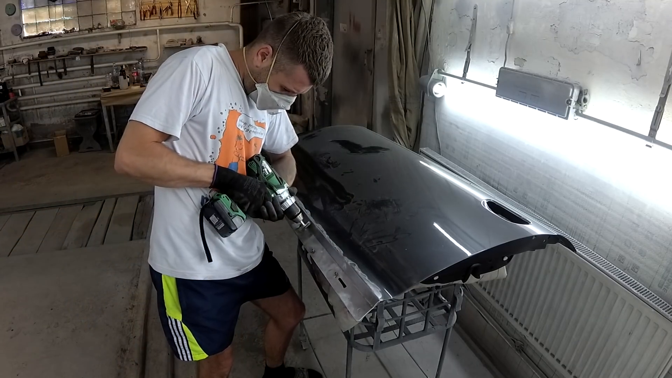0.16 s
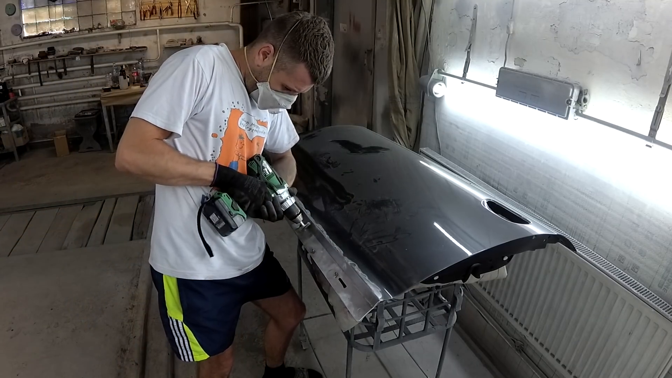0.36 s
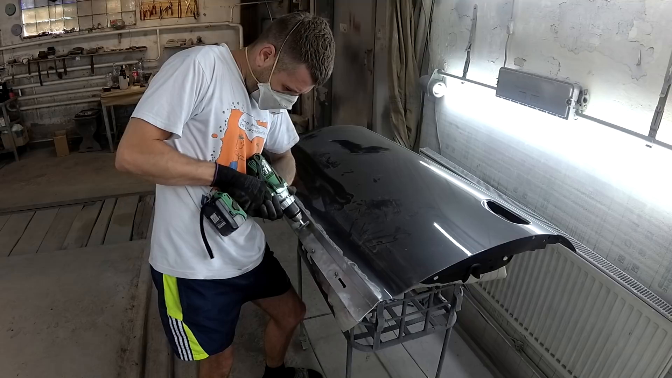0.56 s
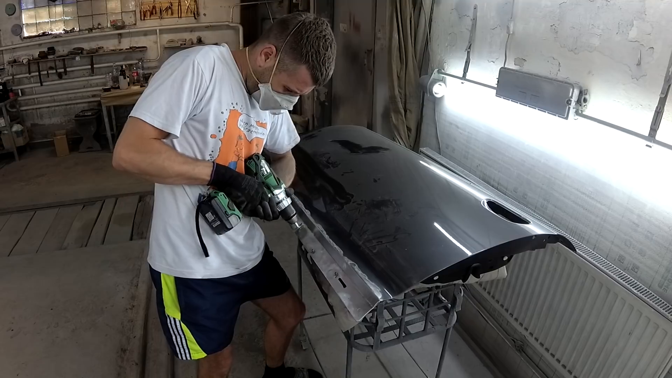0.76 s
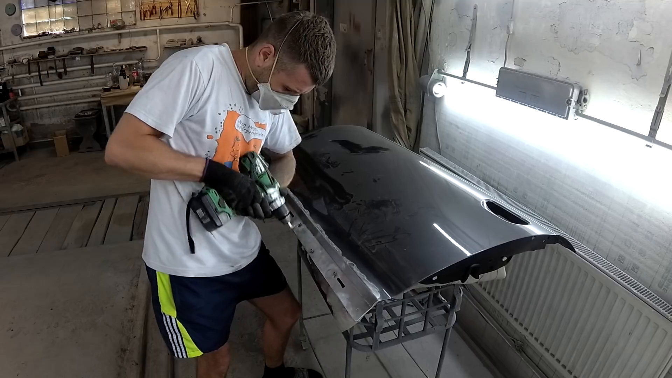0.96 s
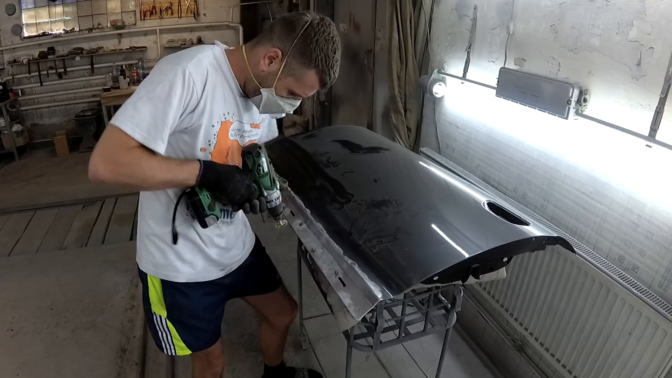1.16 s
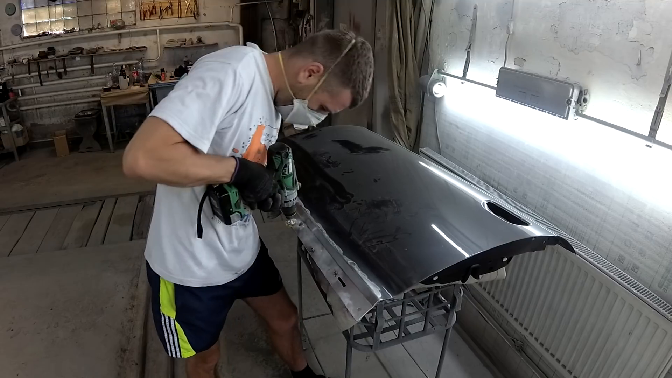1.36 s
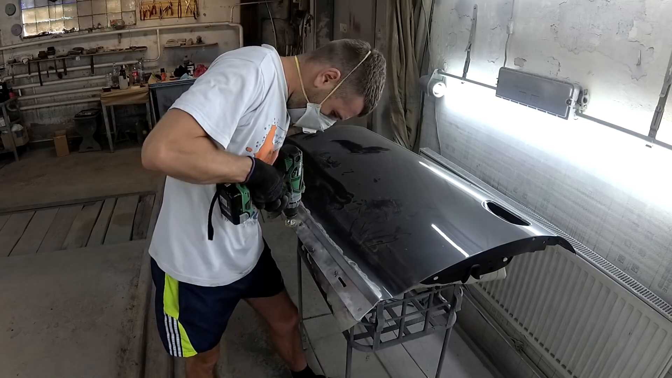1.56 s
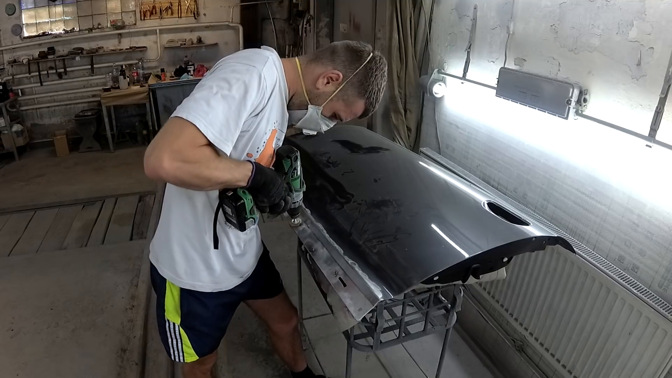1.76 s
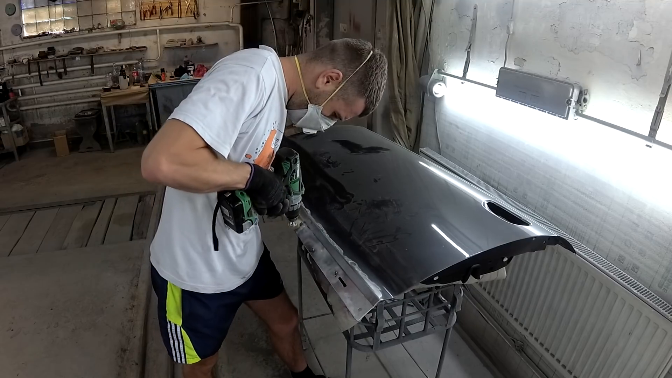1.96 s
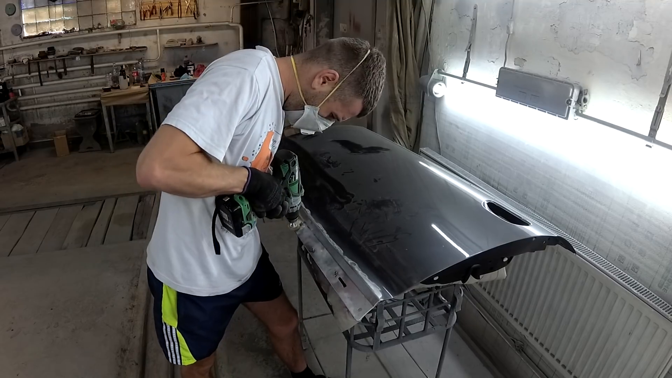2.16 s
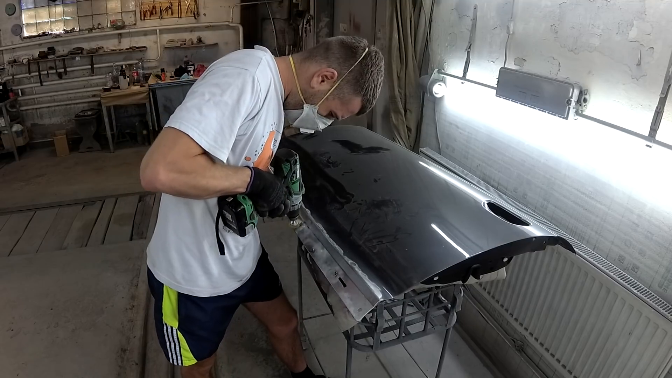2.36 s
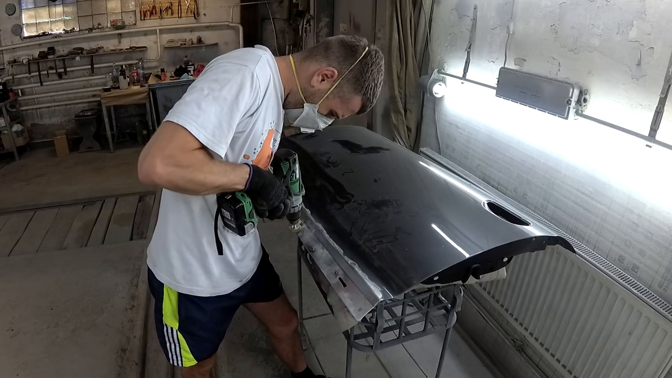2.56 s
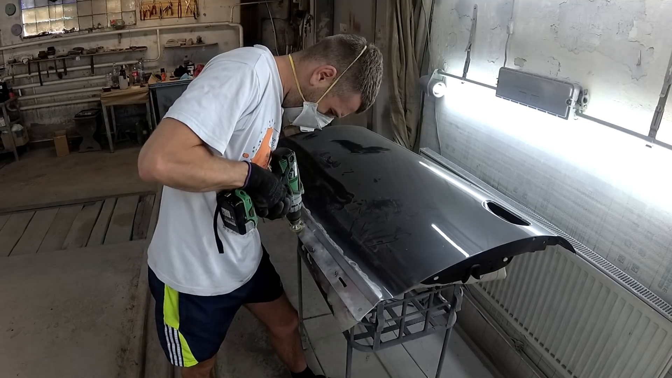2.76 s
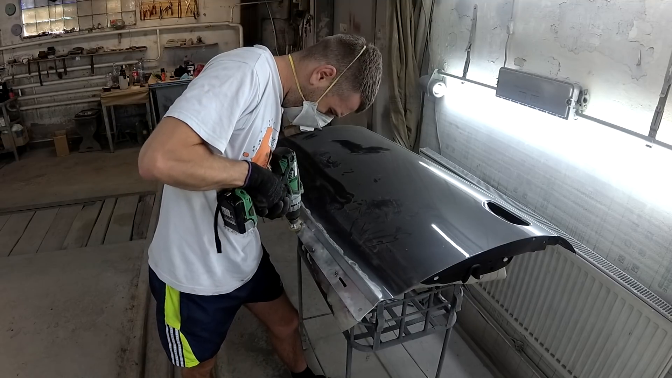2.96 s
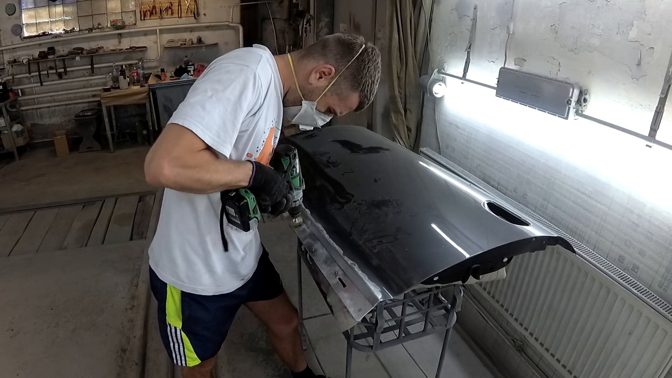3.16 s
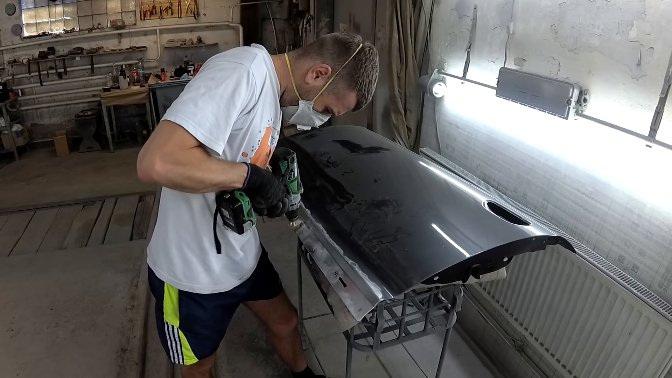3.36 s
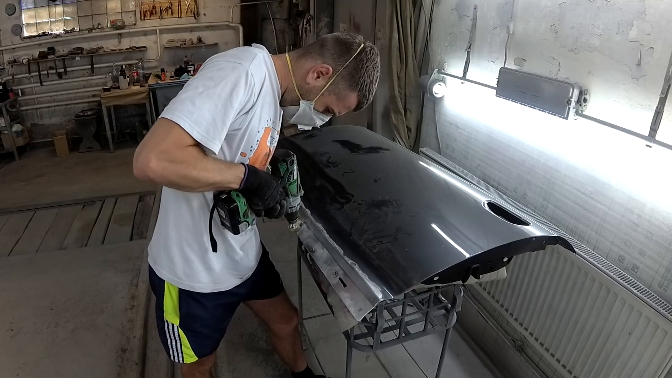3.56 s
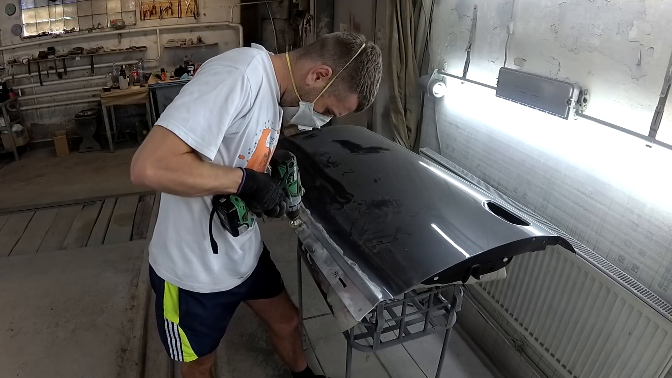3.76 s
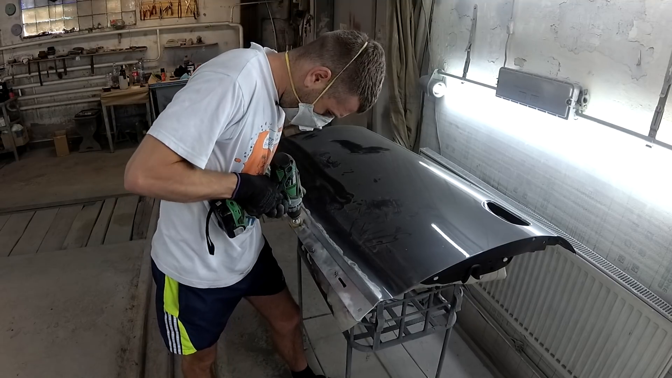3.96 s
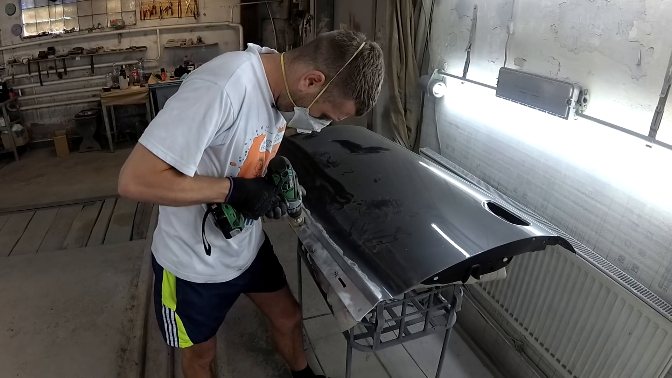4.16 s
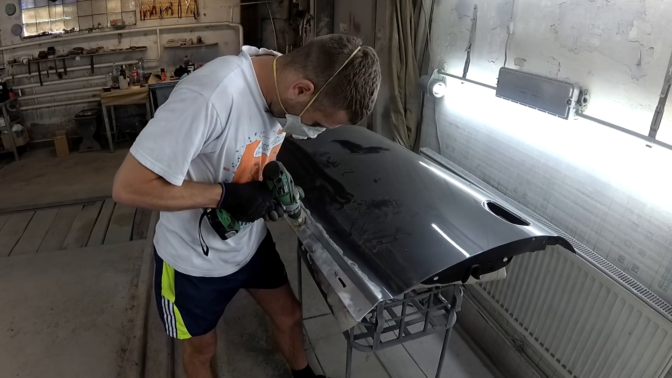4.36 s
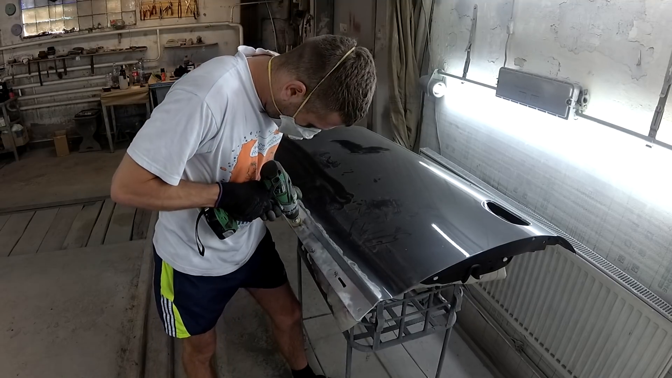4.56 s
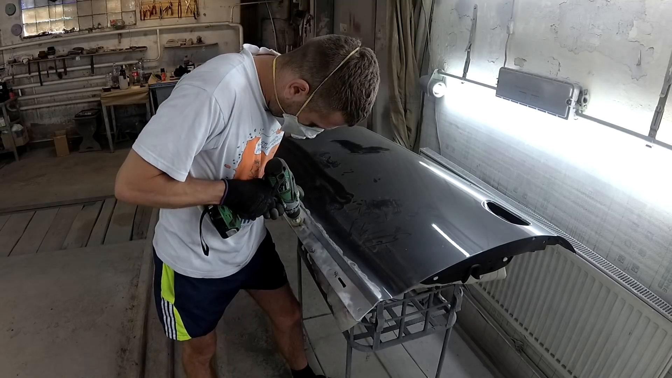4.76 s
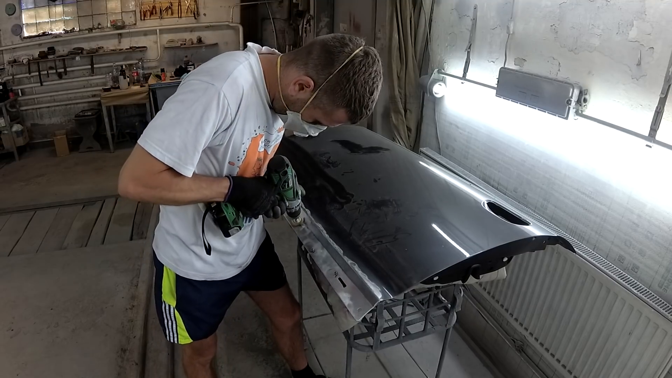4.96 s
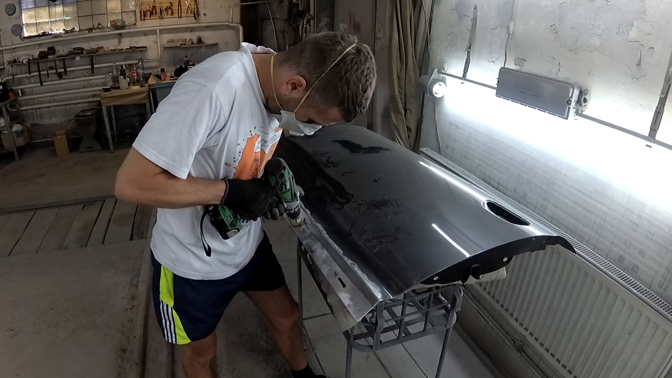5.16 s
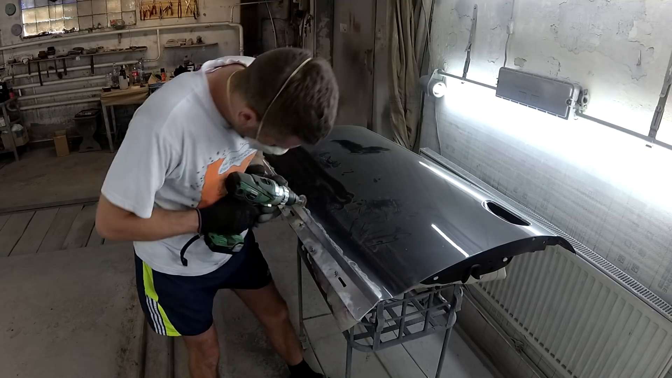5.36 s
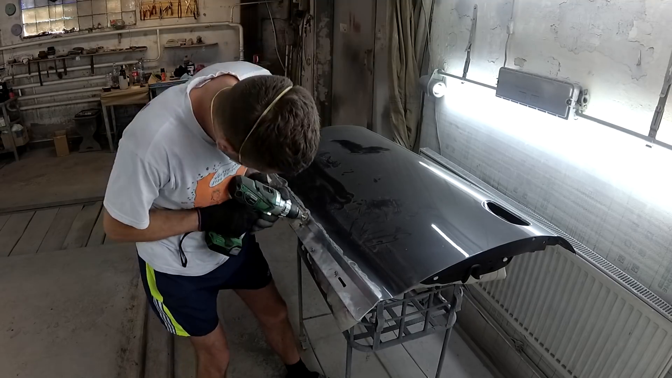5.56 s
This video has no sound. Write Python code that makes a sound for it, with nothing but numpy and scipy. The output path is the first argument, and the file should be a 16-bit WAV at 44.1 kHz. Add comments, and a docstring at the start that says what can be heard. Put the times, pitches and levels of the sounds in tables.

```python
"""A cordless drill spins a small wire brush on the bare edge of a steel car door in a hard-walled workshop.
From the start motor tones and fan noise whir and the brush drags: wire flicks hiss, rasp and ring steel modes
in surges once and twice a turn, with snags, clear notes and dull knocks. It skids, then lifts near 1.07 s.
Faint swishes and two short pushes precede contact from 1.73 s; strokes, snags and notes go on until a skid
and lift near 5.3 s leave motor whir and a last swish. Noise taps give scraping and steel a short tail."""
import sys
import numpy as np
from scipy import signal
from scipy.fft import rfft, irfft, next_fast_len
from scipy.io import wavfile
from scipy.ndimage import uniform_filter1d

SR = 44100
rng = np.random.default_rng(int(sys.argv[2]) if len(sys.argv) > 2 else 0)


def bounce(signal):
    """Save signal as a 16-bit WAV file at the path given by the first command-line argument."""
    frames = np.transpose(np.atleast_2d(signal))
    limited = np.clip(frames, -1, 1)
    pcm = np.round(limited * 32767).astype(np.int16)
    wavfile.write(sys.argv[1], SR, pcm)


N = 248283
T = np.arange(N) / SR  # [s]

# All table levels are relative: later gains and normalisation set the output level.
# brush speed: (time [s], speed [turns/s])
BRUSH_SPEED = [(0, 26.42), (.3, 26.57), (.5, 26.33), (.95, 26.18), (1.3, 26.84), (1.75, 26.54),
               (2.05, 26.0), (3.1, 25.98), (3.6, 25.39), (3.75, 25.6), (3.95, 25.3), (4.15, 25.39),
               (4.5, 25.03), (4.7, 25.39), (5.35, 25.33)]
# free-running motor and gear tones: (frequency [Hz], level [dB])
MOTOR_TONES = [(350.5, -83), (608.3, -85.5), (700, -99), (812, -95), (1055, -89.5), (1405, -92),
               (1755, -91.5), (2105, -88), (2455, -94.5), (3688, -99), (5615, -91), (7020, -99)]
# fan and quiet-shop spectrum: (frequency [Hz], level [dB])
FAN_SPECTRUM = [(20, -16), (40, -22), (60, 5), (90, -19), (115, 10), (160, -44), (270, -7), (420, 11.5),
                (900, 4), (2100, 5.5), (2900, 1), (5500, -2.5), (8000, -8), (16000, -13)]
# door hum: multiples of brush speed [1], their levels [dB]
HUM_ORDERS = [4, 5, 6, 7, 8, 10, 11, 12, 14]
HUM_ORDER_LEVELS_DB = [-104, -96, -92.5, -91.5, -95.5, -86.5, -87, -91, -81]
# hum gain: (time [s], level [dB])
HUM_LEVEL = [(0, 5.5), (1.0, -2), (1.15, -21), (1.7, -8), (2.3, -1.5), (3.4, -5), (4.4, 3.5), (5.25, 5.5),
             (5.42, -17)]

# brush on steel: (touch [s], length [s])
PASSES = [(-0.03, 1.103), (1.729, 3.585)]
# weight of the drill on the door: (time [s], lean [dB])
LEAN = [(0, 3), (.88, 3), (1.0, -9), (1.8, -16.5), (2.3, -5.5), (3.3, -3), (3.7, -2), (4.5, -3.5),
        (4.85, -0.5), (5.26, -2.5), (5.35, -10)]
# resting-brush parts: (level at 0 dB lean [dB], slope [dB/dB]); gears re rasp, rattle re drum
RESTING_PARTS = {"hiss": (-50, 1), "rasp": (-52.5, 0.74), "ring": (-53, 0.76), "drum": (-54.5, 1),
                 "gears": (-16, 0.51), "rattle": (-3.5, -0.41)}
# hand pushes: (start [s], length [s], swell [dB], easing [dB/s], tip hiss [dB], edge ring [dB],
# skin drum [dB], once-a-turn surge [dB], twice-a-turn surge [dB])
PUSHES = [(0.025, 0.018, 4, 132, -66, -65, -52, -1.5, -1), (0.207, 0.63, 7, 96, -61, -70, -69, 1.5, -0.3),
          (0.747, 0.2, 4.5, 248, -45, -40, -44, 4, 0.3), (0.934, 0.068, 0.5, 224, -70, -38, -40, 0, 2),
          (1.533, 0.1, 2.5, 262, -70, -70, -75.5, 0, 7), (1.683, 0.086, 13, 92, -85, -54, -59, 2.5, 2),
          (1.85, 0.13, 13, 177, -36.5, -38, -45.5, 1.5, 1),
          (2.069, 0.038, 0.5, 289, -53, -45.5, -56.5, 1.5, 3),
          (2.186, 0.3, 6, 118, -41.5, -41.5, -48.5, 1.5, -3.5), (2.654, 0.028, 0, 140, -48, -49, -52, 2, 1),
          (2.686, 0.468, 4.5, 136, -41.5, -39.5, -46, 5.5, -0.5),
          (3.119, 0.13, 3, 195, -39, -39.5, -46.5, 1, 1.5), (3.425, 0.15, 6, 88, -42, -44, -48, 2.5, 1),
          (3.713, 0.26, 6, 108, -40, -43, -48.5, 2, -1),
          (4.014, 0.44, 4.5, 103, -38, -40.5, -45.5, 1.4, 0.5),
          (4.428, 0.092, 4, 104, -36.5, -38, -44.5, 0.5, 0.5),
          (4.679, 0.064, 3, 145, -47.5, -48.5, -50.5, -0.5, 1.5),
          (4.922, 0.35, 6, 283, -47.5, -49.5, -54, 0, 3)]
# skids off the edge: (time [s], sheet rattle [dB], rasp [dB])
SKIDS = [(0.965, -46, -53.5), (5.301, -48, -48)]
# swishes of the free brush: (time [s], level [dB])
SWISHES = [(1.275, -77), (1.345, -69.5), (5.455, -62.5)]

# wire-tip hiss spectrum: (frequency [Hz], level [dB])
HISS_SPECTRUM = [(300, -60), (3000, -11), (6500, -31), (8000, -30), (9300, -8), (10500, -9), (11700, -4.5),
                 (12200, -2.5), (14500, -4.5), (16000, -3)]
# rasp spectrum: (frequency [Hz], level [dB])
RASP_SPECTRUM = [(150, -34), (300, -23), (1200, 3), (2200, 3), (3200, 3), (3750, 3), (4350, 0.5), (4900, 1),
                 (6300, -0.5), (7800, 2.5), (9200, 3), (11000, -2), (16000, -9)]
# short steel wire modes: (frequency [Hz], width [Hz], level [dB])
WIRE_MODES = [(8070, 200, -1), (9100, 190, -2), (11160, 200, -0.5), (12050, 93, 7), (12500, 96, 5),
              (12930, 110, 7), (13380, 100, 10.5), (13700, 110, 3), (13700, 170, 5), (14500, 90, 0),
              (14530, 110, 5), (14800, 140, -3), (15500, 120, 1), (15550, 110, 3)]
# door edge modes: (frequency [Hz], width [Hz], level [dB])
EDGE_MODES = [(871, 10.2, -0.5), (900.2, 12.4, 1.5), (990, 12.4, -2.5), (1096, 23, -13.5),
              (1110, 14.7, 3.5), (1131.6, 31, -2.5), (1158, 55, -3.5), (1180, 9.9, -6), (1287, 7.8, -3.5),
              (1371.5, 34, -1.5), (1422, 21, 0), (1455, 25, -3), (1626, 18, -5), (1687, 18, -2),
              (2016, 8.8, -9)]
# door skin modes: (frequency [Hz], width [Hz], level [dB])
SKIN_MODES = [(274, 34, -8.5), (306, 6.9, -6), (357, 8.9, -1), (402.1, 8.1, 4), (415.3, 17, 9.5),
              (449, 20.6, 6), (476, 21, -2.5), (499.8, 24, 3.5), (540, 6.1, -3), (660, 16, -14.5),
              (689, 15, -8), (796, 16, -15)]
# whole-sheet rattle modes: (frequency [Hz], width [Hz], level [dB])
SHEET_MODES = [(404.8, 11.6, -0.5), (552, 5.9, -3.5), (676, 22, -5.5), (786, 24, -3.5), (870.5, 39, -5),
               (1230, 13, -11), (1402, 43, -4), (1697, 10.5, 7.5), (1793, 8.5, 0.5), (1873, 12, -1.5),
               (1950, 16.4, 4.5), (1993, 19, 0.5), (2132, 76, -5), (2232, 38, -1), (2285, 24, -2.5),
               (2420, 37, -6.5), (2630, 18, -10)]
# smooth spectrum of the sheet's crowd of weak modes: (frequency [Hz], level [dB])
SHEET_SPECTRUM = [(150, -39), (250, -50), (350, -32), (500, -0.5), (720, 2), (1000, -15.5), (1300, -1),
                  (1800, -3), (2400, -3.5), (2800, -4), (4500, -12.5), (7000, -19)]
# wires snag: (time [s], hiss and rasp rise [s], tip hiss [dB], rasp [dB], door thump [dB])
SNAGS = [(0.060, 0.0044, -48, -58, -42.5), (0.333, 0.0063, -48, -68, -36), (0.431, .002, -55, -58, -48),
         (0.585, .003, -45, -66, -40.5), (0.709, .004, -48, -62, -46), (0.819, 0.0013, -49, -69, -63),
         (0.934, 0.0043, -50, -60, -60), (1.043, 0.0038, -68, -47.5, -56), (1.602, 0.006, -69, -75, -51.5),
         (1.768, 0.014, -51.5, -67, -54), (1.84, 0.0086, -49, -67, -44), (2.1, .002, -58, -61, -57),
         (2.187, 0.0029, -54, -72, -45), (2.687, 0.00083, -45, -55, -36), (2.836, 0.0036, -52, -61, -39),
         (3.231, 0.0064, -52, -53, -42), (3.369, 0.0065, -52, -64, -36.5), (3.427, 0.0014, -50, -66, -52),
         (3.969, 0.0015, -46, -55, -64), (4.126, .004, -47, -72, -48), (4.24, 0.0054, -44, -67, -51),
         (4.598, .002, -51, -66, -43), (4.716, 0.0018, -45, -66, -46), (4.753, .004, -48, -71, -36),
         (4.911, 0.0022, -39, -59, -37.5), (4.965, .005, -60, -71, -46), (5.267, 0.0026, -53, -66, -54),
         (5.311, 0.0029, -61, -58, -53), (5.33, 0.0023, -66, -57, -58)]
# one mode sings out: (peak time [s], frequency [Hz], peak level [dB], swell [s])
FLARES = [(.075, 1118, -46.5, 0.011), (.26, 402, -50, 0.053), (0.337, 1123, -42.5, 0.007),
          (.45, 1116, -50.5, 0.013), (.603, 1110, -54, 0.0067), (.84, 1112, -56, 0.019),
          (.96, 1100, -50, 0.014), (1.0, 400, -58, 0.049), (1.02, 1692, -44.5, 0.031),
          (1.145, 1552, -61, 0.066), (1.98, 1111, -42, 0.019), (2.772, 1125, -41, 0.013),
          (2.888, 1106, -38, 0.01), (2.925, 442, -42.5, 0.014), (3.11, 1109, -40, 0.0076),
          (3.148, 1428, -43, 0.055), (3.15, 408, -47, 0.019), (3.248, 1118, -47, 0.017),
          (3.895, 1106, -45.5, 0.045), (3.952, 1110, -41, 0.015), (4.395, 1108, -37.5, 0.028),
          (4.5, 410, -45, 0.04), (4.51, 897, -43.5, 0.03), (4.532, 1112, -37, 0.013),
          (4.769, 1113, -47, 0.014), (4.926, 1115, -42.5, 0.0091)]
# door rocks on its stand: (time [s], level [dB])
KNOCKS = [(0.785, -71), (0.865, -70), (1.96, -77), (2.69, -76), (2.842, -69), (2.995, -76), (3.232, -70),
          (4.445, -69), (4.495, -73)]

# left-right correlation: (frequency [Hz], likeness [0-1])
LIKENESS = [(30, .4), (60, .65), (125, .9), (250, .995), (1000, .98), (2000, .85), (4000, .5), (8000, .4),
            (14000, .55)]
# left over right: (frequency [Hz], level difference [dB])
BALANCE_DB = [(30, 15), (60, 4), (110, 2), (200, 2.5), (380, 0), (700, -2), (1290, -1), (2380, -0.5),
              (4400, 5.5), (8120, 7), (15000, 14.5)]
# phase by which left leads: (frequency [Hz], lead [rad])
LEAD_RAD = [(100, 0), (400, 0.1), (750, .5), (1200, 0.71), (1810, 0.8), (2500, 1.5), (3530, 4), (4310, 5),
            (5200, 7.5), (16000, 8)]
# room decay: (frequency [Hz], t60 [s])
ROOM_T60_S = [(250, 0.34), (700, 0.3), (1800, 0.34), (5000, 0.38), (14000, 0.18)]

TOUCH_RISE_S, LIFT_DB_PER_S, PUSH_RISE_S = 0.012, 230, 0.007
PUSH_RASP_DB, PUSH_RASP_POWER = -29, 0.57  # rasp grows more slowly than hiss
HIGH_SIDE_TURNS = .27  # rim's high side at the start
DOOR_LAG_TURNS = 0.092  # steel answers after the wires land
TUFTS_PER_TURN, TUFT_DB = 5, .9
BITE_SHARPNESS = 1.5  # power; higher leaves longer lulls between bites
TIP_HZ, TIP_SURGE_POWER, SHANK_SURGE_POWER = 11600, 1.25, .7  # tips hiss above TIP_HZ, shanks below
MESH_CYCLES_PER_TURN = 166
REPEAT_DB = -24  # level of each repeating harmonic beside flicks of rms 1
FLARE_FALL_DB_PER_S = 340
CUT_HZ = 15780


def amp(db):
    """Decibels to gain."""
    return 10 ** (np.asarray(db) / 20)


def rms(x):
    """Root mean square."""
    return np.sqrt(np.mean(x ** 2))


def unit(x):
    """Scales to rms 1; for a pair, the rms of its mid signal."""
    return x / np.sqrt(np.mean(np.atleast_2d(x).mean(0) ** 2) + 1e-20)


def at_hz(points, hz):
    """Interpolates a table on a log-frequency axis."""
    f, value = np.transpose(points)
    return np.interp(np.log(hz + 1), np.log(f + 1), value)


def curves(rows):
    """Interpolates every column of a time table over the samples."""
    s, *columns = np.transpose(rows)
    return [np.interp(T, s, c) for c in columns]


def filtered(x, response):
    """Applies a complex gain given as a function of Hz."""
    size = next_fast_len(N + 8192)
    hz = np.fft.rfftfreq(size, 1 / SR)
    return irfft(rfft(x, size) * response(hz), size)[..., :N]


def coloured(x, spectrum):
    """Applies a smooth spectrum."""
    return filtered(x, lambda hz: amp(at_hz(spectrum, hz)))


def wander(rate_hz):
    """Low-passed noise of rms 1."""
    return unit(filtered(rng.standard_normal(N), lambda hz: 1 / (1 + (hz / rate_hz) ** 4)))


def ringing(x, modes):
    """Sums damped resonances, each rolled off beyond about an octave from its mode."""
    grid = np.linspace(1, SR / 2, SR // 4)
    gain = 0
    for f, width, db in modes:
        resonance = amp(db) / (1 + 1j * (grid ** 2 - f ** 2) / (grid * width))
        gain = gain + resonance / (1 + (f / (1.5 * grid)) ** 8 + (grid / (2 * f)) ** 4)
    return filtered(x, lambda hz: np.interp(hz, grid, gain))


def stereo(pair):
    """Sets likeness, balance and phase lead between two channels by frequency."""
    def same(hz):
        return np.clip(at_hz(LIKENESS, hz), 0, 1)

    def right_gain(hz):
        return amp(-at_hz(BALANCE_DB, hz) / 2) * np.exp(-1j * at_hz(LEAD_RAD, hz))

    left = filtered(pair[0], lambda hz: amp(at_hz(BALANCE_DB, hz) / 2))
    right = filtered(pair[0], same) + filtered(pair[1], lambda hz: np.sqrt(1 - same(hz) ** 2))
    return unit(np.array([left, filtered(right, right_gain)]))


def bumps(rows, rise_s):
    """Adds a quick rise and slower fall of force at each (time [s], level [dB])."""
    force = np.zeros(N)
    u = np.arange(SR // 5) / SR / rise_s
    for s, db in rows:
        part = force[int(s * SR):][:len(u)]
        part += (amp(db) * u * np.exp(1 - u))[:len(part)]
    return force


def stroke(start_s, length_s, rise_s, fall_db_per_s, swell_db=0):
    """Gain that rises quickly, swells to 1 at the end of its length, then dies away."""
    t = T - start_s
    swell = swell_db * (np.clip(t / length_s, 0, 1) - 1)
    fall = fall_db_per_s * np.maximum(t - length_s, 0)
    return np.clip(t / rise_s, 0, 1) * amp(swell - fall)


def motor(waver, flutter_db):
    """Motor and gear sines waver together over shaped noise of the cooling fan and quiet shop."""
    clock_s = np.cumsum(1 + waver * wander(rate_hz=9.1)) / SR
    tones = np.zeros((2, N))
    for hz, db in MOTOR_TONES:
        angle = 2 * np.pi * (hz * clock_s + rng.random())
        level = amp(db + flutter_db * wander(rate_hz=6.4))
        tones += level * np.sin([angle, angle - at_hz(LEAD_RAD, hz)])
    fan = stereo(coloured(rng.standard_normal((2, N)), FAN_SPECTRUM))
    return amp(8.5) * tones + amp(-73.5) * fan


def turns():
    """Integrates brush speed to turns made."""
    return np.cumsum(curves(BRUSH_SPEED)[0]) / SR


def hum(flutter_db):
    """The unbalanced brush shakes the door at multiples of its speed."""
    angle = 2 * np.pi * turns()
    tone = np.zeros(N)
    for order, db in zip(HUM_ORDERS, HUM_ORDER_LEVELS_DB):
        level = amp(db + flutter_db * wander(rate_hz=1.6))
        tone += level * np.cos(order * angle + 2 * np.pi * rng.random())
    return np.sqrt(2) * tone * amp(curves(HUM_LEVEL)[0])


def resting(part):
    """Gain of one resting-brush part, set by the drill's lean."""
    db, slope = RESTING_PARTS[part]
    return amp(db + slope * curves(LEAN)[0])


def contact():
    """Adds pushes to resting-brush power: gains of (hiss, rasp, ring, drum, rattle)."""
    touch = np.max([stroke(s, length, TOUCH_RISE_S, LIFT_DB_PER_S) for s, length in PASSES], axis=0)
    pushes = []
    for s, length, swell_db, easing, hiss_db, ring_db, drum_db, *_ in PUSHES:
        pushes.append(amp([[hiss_db], [ring_db], [drum_db]]) * stroke(s, length, PUSH_RISE_S, easing, swell_db))
    pushed = np.max(pushes, axis=0)
    rested = [touch * resting(part) for part in ("hiss", "ring", "drum")]
    hiss, ring, drum = np.hypot(pushed, rested)
    skid_rattle, skid_rasp = [bumps([(row[0], row[k]) for row in SKIDS], rise_s=0.045) for k in (1, 2)]
    push_rasp = amp(PUSH_RASP_DB) * pushed[0] ** PUSH_RASP_POWER
    rasp = touch * np.linalg.norm([resting("rasp"), push_rasp, skid_rasp], axis=0)
    rattle = np.hypot(drum * resting("rattle"), touch * skid_rattle)
    return hiss, rasp, ring, drum, rattle


def tuft(angle):
    """One tuft pass from -1 to 1: it lands quickly and drags off slowly."""
    skewed = angle - .5 * (1 - np.cos(angle))
    return 2 * abs(np.cos(skewed / 2)) ** (2 * BITE_SHARPNESS) - 1


def bite(uneven_db, lag_turns=0):
    """The oval, off-centre rim bites once and twice a turn and tufts chatter: local mean power near 1."""
    angle = 2 * np.pi * (turns() + HIGH_SIDE_TURNS - lag_turns)
    starts, *_, once, twice = np.transpose(PUSHES)
    push = np.maximum(np.searchsorted(starts, T) - 1, 0)  # latest push sets the surge depth
    once_db, twice_db = uniform_filter1d(np.array([once[push], twice[push]]), size=2000)
    surge_db = once_db * tuft(angle) + twice_db * tuft(2 * angle)
    chatter_db = TUFT_DB * tuft(TUFTS_PER_TURN * angle)
    gain = amp(surge_db + chatter_db + uneven_db * wander(rate_hz=90))
    return gain / np.sqrt(uniform_filter1d(gain ** 2, size=3400))


def wire_clicks(per_s, spread_db):
    """Single wires flick the steel at random moments with uneven force."""
    force = amp(spread_db * np.minimum(rng.exponential(1, N), 4))
    return force * (rng.random(N) < per_s / SR) * rng.standard_normal((2, N))


def wires(hiss_gain, rasp_gain, surge, snag_hiss, snag_rasp):
    """Flicks hiss and rasp; the brightest tip hiss pulses hardest, the rasp least."""
    tips = unit(ringing(wire_clicks(per_s=5000, spread_db=0.0), WIRE_MODES))
    smooth = unit(coloured(wire_clicks(per_s=9000, spread_db=1.5), HISS_SPECTRUM))
    hiss = stereo(smooth + amp(-1.5) * tips)
    lower = filtered(hiss, lambda hz: 1 / (1 + (hz / TIP_HZ) ** 20))
    pulsing = (hiss - lower) * surge ** TIP_SURGE_POWER + lower * surge ** SHANK_SURGE_POWER
    rasp = stereo(coloured(wire_clicks(per_s=14000, spread_db=0.5), RASP_SPECTRUM))
    hiss_out = amp(-3.0) * hiss_gain * pulsing + snag_hiss * hiss
    rasp_out = rasp * (amp(-1.73) * rasp_gain * surge ** 0.26 + snag_rasp)
    return hiss_out, rasp_out


def gears(load, jitter, flutter_db):
    """Under load the gear mesh sings a rough sine that follows brush speed."""
    hz = MESH_CYCLES_PER_TURN * curves(BRUSH_SPEED)[0] * (1 + jitter * wander(rate_hz=138.5))
    tone = np.sin(2 * np.pi * np.cumsum(hz) / SR) * amp(flutter_db * wander(rate_hz=30))
    return stereo([tone, np.zeros(N)]) * load * resting("gears")


def rung_on(gain, seconds):
    """A resonant body's level lags its drive: one-pole smoothing of power."""
    r = np.exp(-1 / (abs(seconds) * SR))
    return np.sqrt(signal.lfilter([1 - r], [1, -r], gain ** 2) + 1e-20)


def rim_pattern(slip_turns):
    """The same wires return each turn with slight slip: harmonics 15-59 of brush speed."""
    angle = 2 * np.pi * (turns() + slip_turns * wander(rate_hz=7))
    force = sum(np.cos(k * angle + 2 * np.pi * rng.random()) for k in range(15, 60))
    return amp(REPEAT_DB) * np.array([force, np.zeros(N)])


def struck(modes, force, pattern, per_s, spread_db):
    """Flicks plus the turn pattern, scaled by force, drive modes that ring on when it lets go."""
    flicks = unit(wire_clicks(per_s, spread_db)) + pattern
    return stereo(ringing(flicks * force, modes)) * rms(force)


def door(ring, drum, rattle, surge, thump):
    """The same scraping rings the edge, the wide skin and the sheet's crowd of weaker modes."""
    push = rung_on(surge ** 0.98, seconds=0.0033)  # bending waves take a moment to fill the steel
    pattern = rim_pattern(slip_turns=0.0038)
    edge_force = amp(-6.5) * ring * push + amp(-11.5) * thump
    skin_force = amp(-5.5) * drum * push + amp(-18.5) * thump
    edge = struck(EDGE_MODES, edge_force, pattern, per_s=5000, spread_db=0.2)
    skin = struck(SKIN_MODES, skin_force, pattern, per_s=2500, spread_db=-2.2)
    sheet = struck(SHEET_MODES, amp(-4.5) * rattle * push, pattern, per_s=3000, spread_db=1.5)
    shaken = amp(-4.5) * rung_on(rattle * push, seconds=0.0023) + amp(-20.0) * thump
    crowd = stereo(coloured(wire_clicks(per_s=5000, spread_db=2.5), SHEET_SPECTRUM)) * shaken
    return edge + skin + sheet + crowd


def snags(thump_rise_s):
    """Brief extra force when wires catch: (hiss, rasp, thump) envelopes."""
    hiss, rasp = [sum(bumps([(row[0], row[k])], row[1]) for row in SNAGS) for k in (2, 3)]
    thump = bumps([(row[0], row[4]) for row in SNAGS], thump_rise_s)
    return hiss, rasp, thump


def singing(surge, waver, rough_db):
    """A caught mode swells into a rough, wavering sine and rings out."""
    clock_s = np.cumsum(1 + waver * wander(rate_hz=65)) / SR
    note = np.zeros(N)
    for s, hz, db, swell_s in FLARES:
        swell = np.exp(-(np.minimum(T - s, 0) / swell_s) ** 2)
        fall = amp(db - FLARE_FALL_DB_PER_S * np.maximum(T - s, 0))
        note += swell * fall * np.sin(2 * np.pi * (hz * clock_s + rng.random()))
    note *= surge ** 0.48 * amp(rough_db * wander(rate_hz=67))
    return stereo([note, np.zeros(N)]) * rms(note)


def stand(edge_hz):
    """The door rocks: low-passed clicks, thinned in the deep bass, swell into dull knocks."""
    def dull(hz):
        return hz / (hz + 60) / (1 + (hz / edge_hz) ** 4)
    thud = stereo(filtered(wire_clicks(per_s=2200, spread_db=2.5), dull))
    return thud * bumps(KNOCKS, rise_s=0.0037)


def workshop(x, wet_db):
    """Dense reflections die band by band; their bass is alike in both channels."""
    taps = rng.standard_normal((2, SR // 2)) * (np.arange(SR // 2) > .005 * SR)
    hz, t, z = signal.stft(taps, SR, nperseg=256)
    shared = 1 / (1 + (hz[:, None] / 2200) ** 4)
    z[1] = shared * z[0] + np.sqrt(1 - shared ** 2) * z[1]
    decay = amp(-60 * t / at_hz(ROOM_T60_S, hz)[:, None])
    tail = signal.istft(z * decay, SR, nperseg=256)[1]
    return x + amp(wet_db) * signal.fftconvolve(x, tail / np.linalg.norm(tail[0]), axes=1)[:, :N]


def scene():
    """Mixes drill, wires and door in the workshop."""
    whir = motor(waver=0.00183, flutter_db=2.0)
    hiss_gain, rasp_gain, ring, drum, rattle = contact()
    surge = bite(uneven_db=1.1)
    door_surge = bite(uneven_db=1.1, lag_turns=DOOR_LAG_TURNS)
    snag_hiss, snag_rasp, thump = snags(thump_rise_s=0.0065)
    swishing_rasp = rasp_gain + bumps(SWISHES, rise_s=0.02)
    hiss, rasp = wires(hiss_gain, swishing_rasp, surge, snag_hiss, snag_rasp)
    mesh = gears(rasp_gain, jitter=0.009, flutter_db=2)
    tips = workshop(hiss, wet_db=-12)
    drag = workshop(rasp + mesh, wet_db=-5.5)
    struck_steel = door(ring, drum, rattle, door_surge, thump) + stand(edge_hz=140)
    steel = workshop(struck_steel, wet_db=-10.5)
    notes = singing(door_surge, waver=0.0057, rough_db=1.5)
    return whir + hum(flutter_db=4.0) + tips + drag + steel + notes


def record(dry):
    """Low-passes the mix at CUT_HZ with a linear-phase FIR."""
    lowpass = signal.firwin(511, CUT_HZ, window=("kaiser", 9), fs=SR)
    return signal.oaconvolve(dry, lowpass[None], "same")


dry = scene()
out = record(dry)
bounce(out)
```